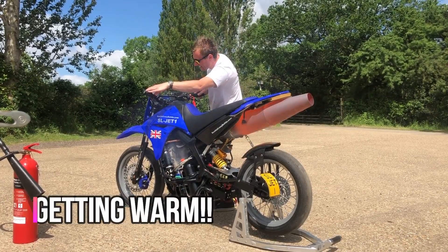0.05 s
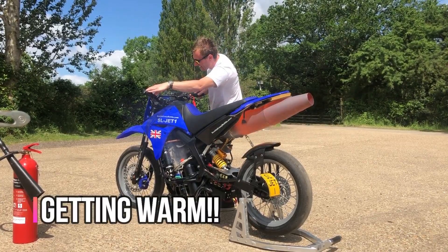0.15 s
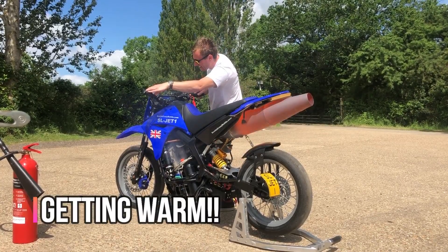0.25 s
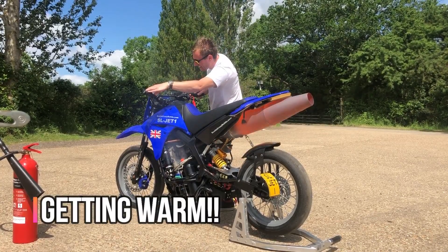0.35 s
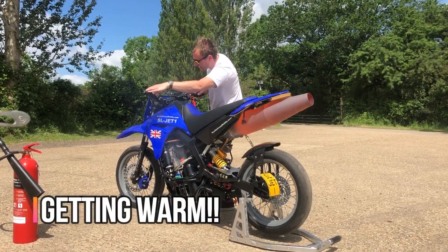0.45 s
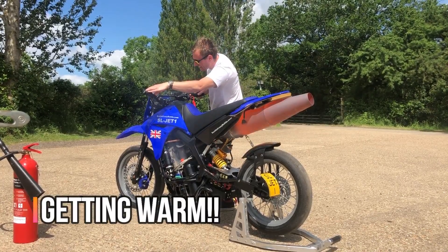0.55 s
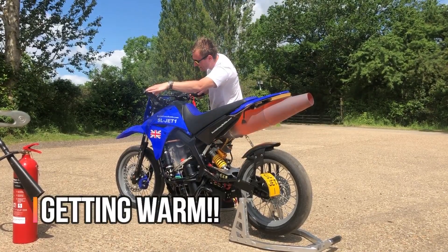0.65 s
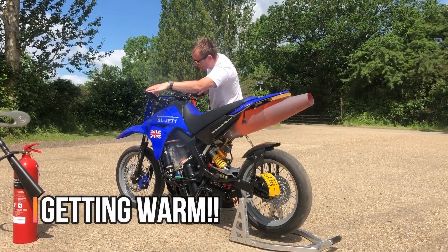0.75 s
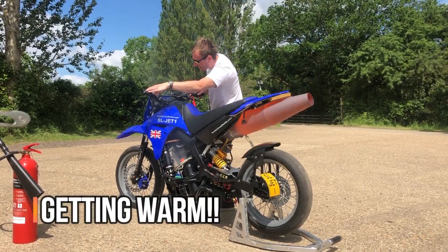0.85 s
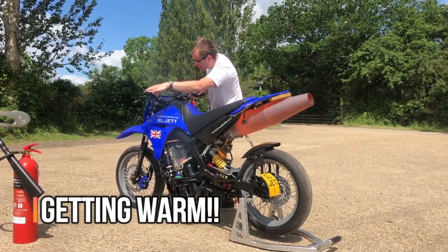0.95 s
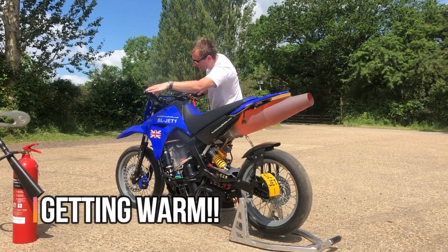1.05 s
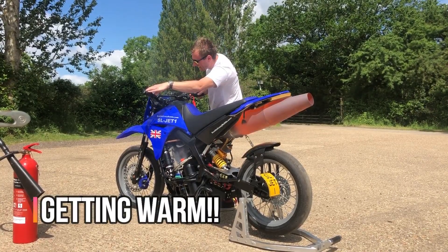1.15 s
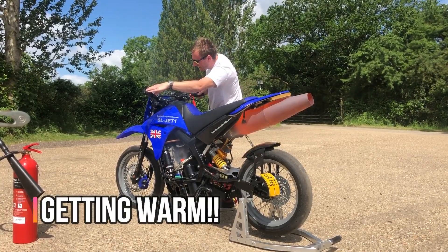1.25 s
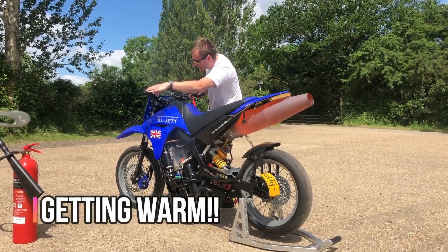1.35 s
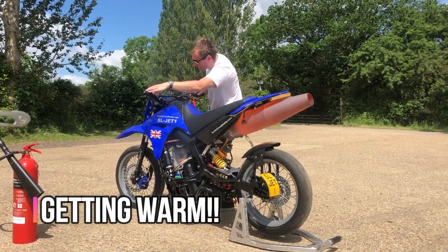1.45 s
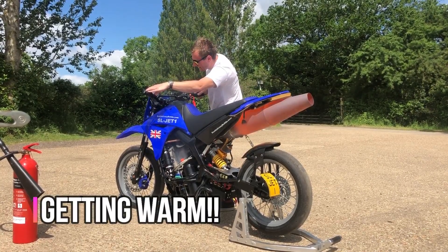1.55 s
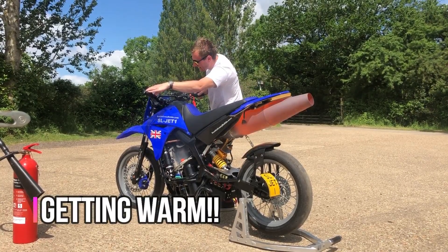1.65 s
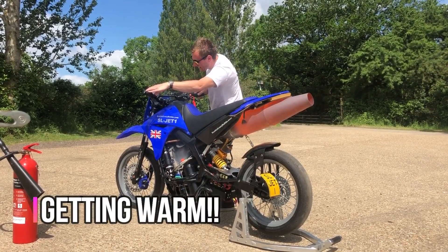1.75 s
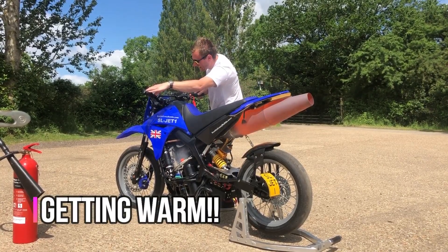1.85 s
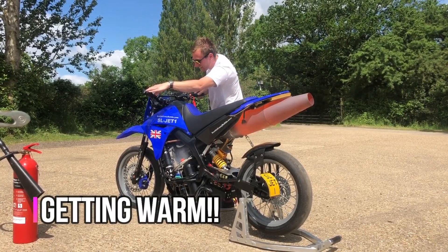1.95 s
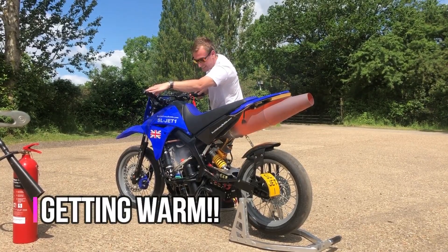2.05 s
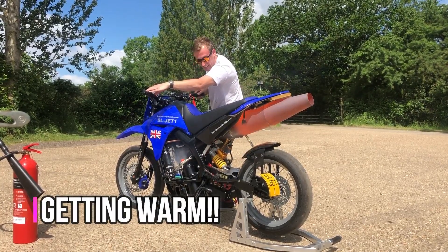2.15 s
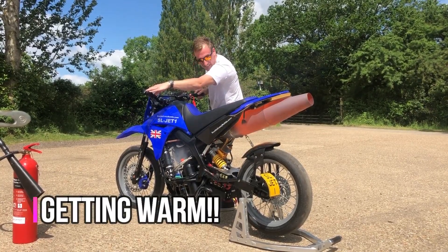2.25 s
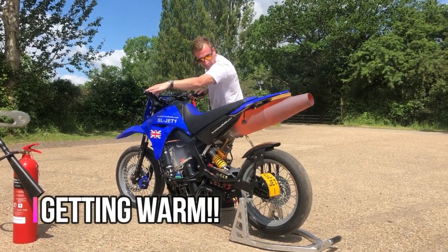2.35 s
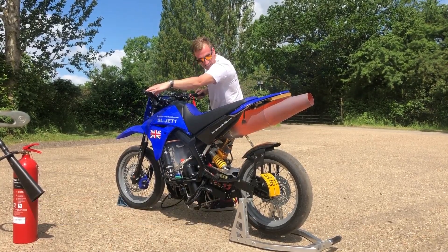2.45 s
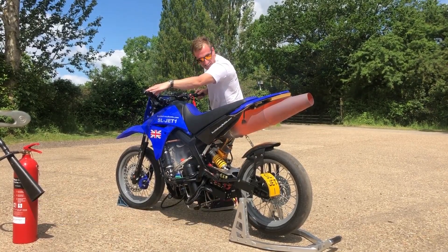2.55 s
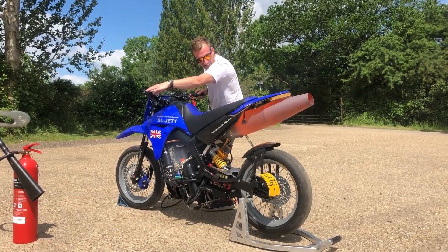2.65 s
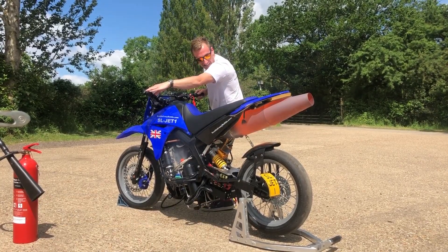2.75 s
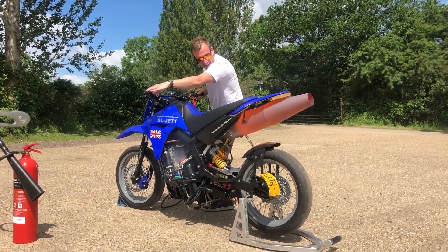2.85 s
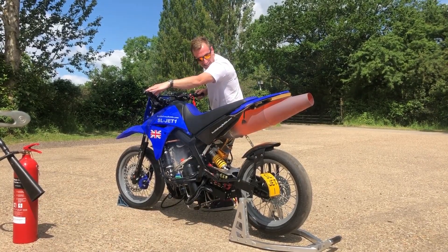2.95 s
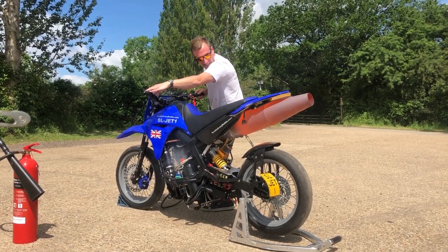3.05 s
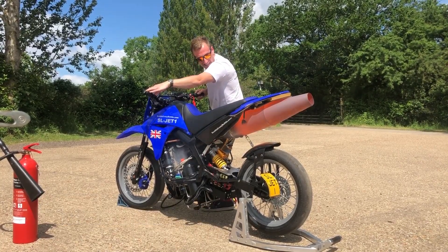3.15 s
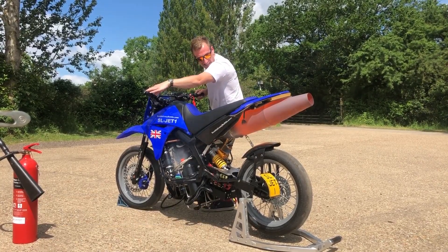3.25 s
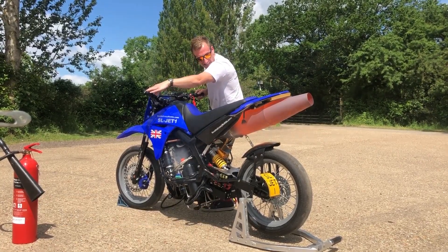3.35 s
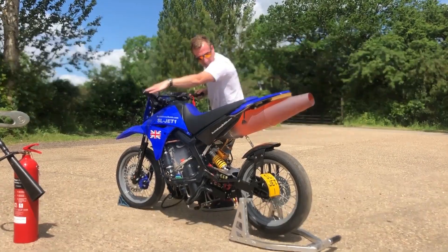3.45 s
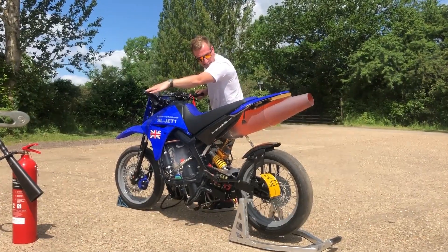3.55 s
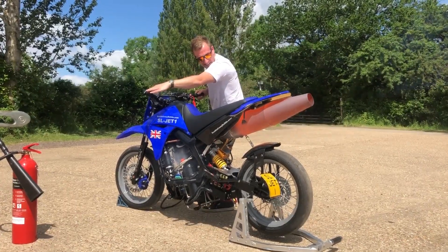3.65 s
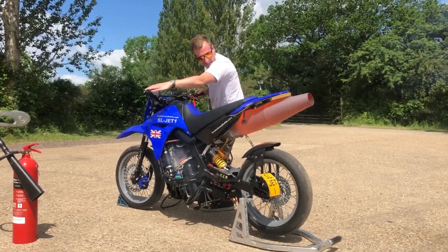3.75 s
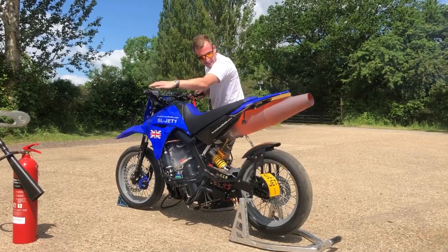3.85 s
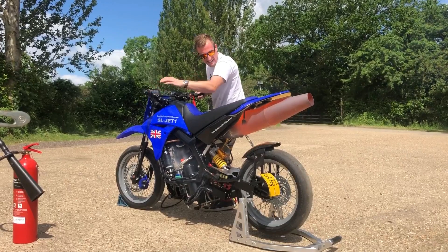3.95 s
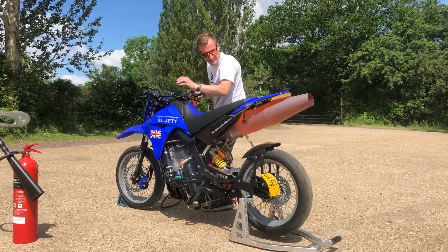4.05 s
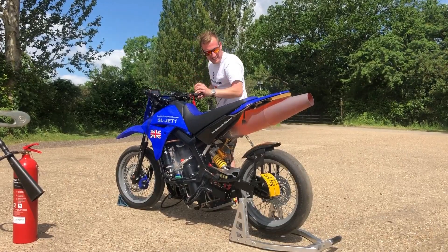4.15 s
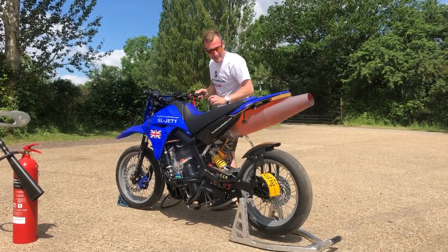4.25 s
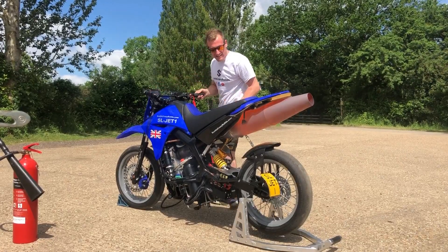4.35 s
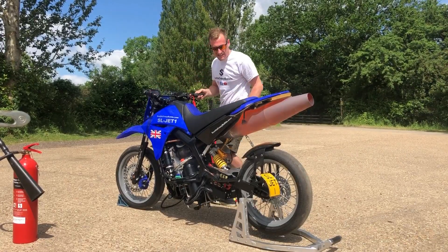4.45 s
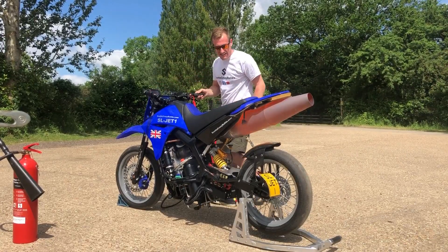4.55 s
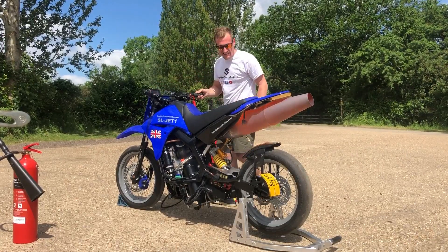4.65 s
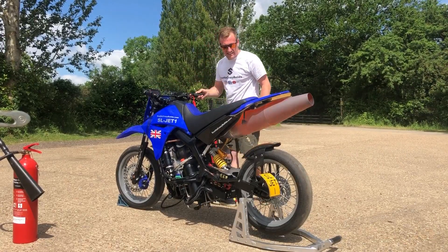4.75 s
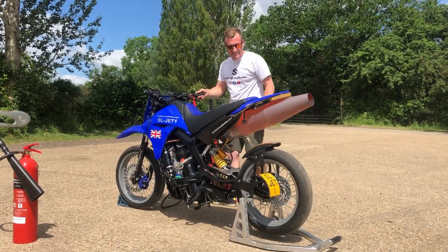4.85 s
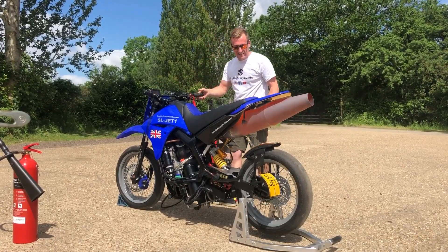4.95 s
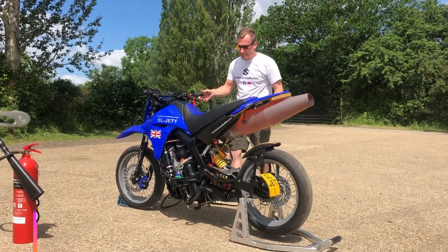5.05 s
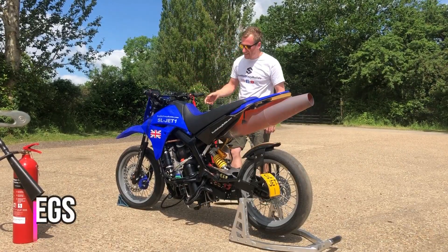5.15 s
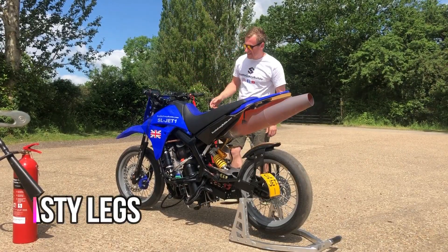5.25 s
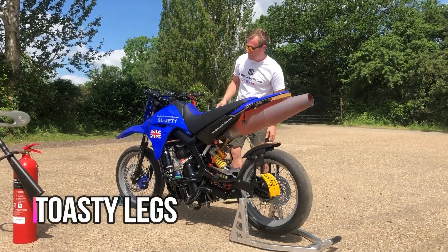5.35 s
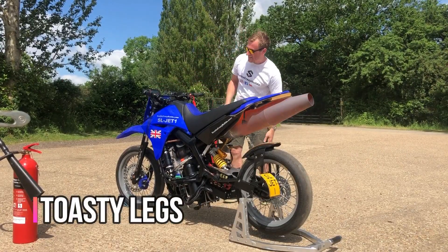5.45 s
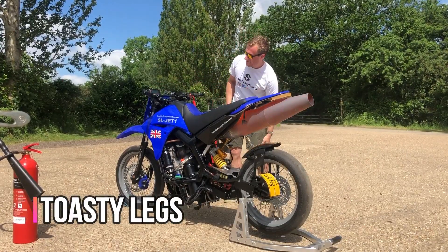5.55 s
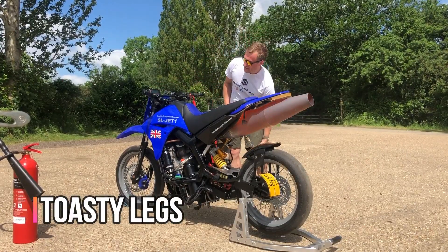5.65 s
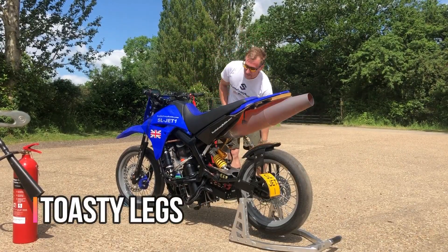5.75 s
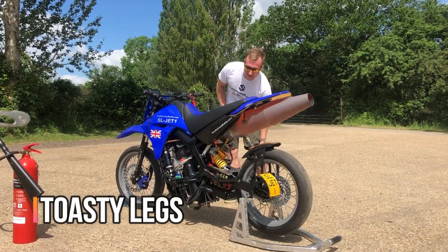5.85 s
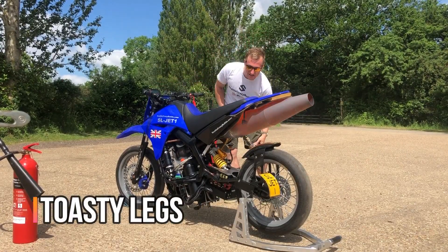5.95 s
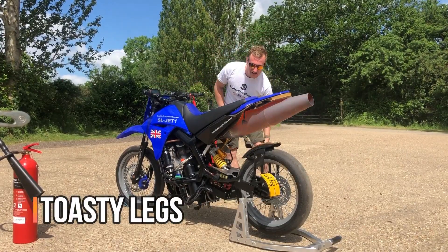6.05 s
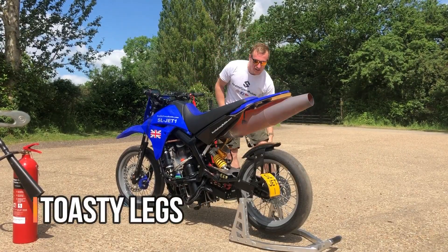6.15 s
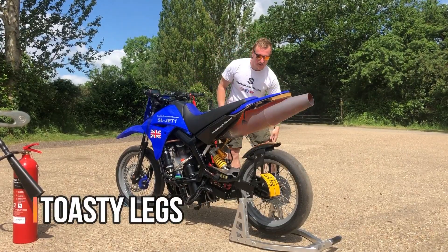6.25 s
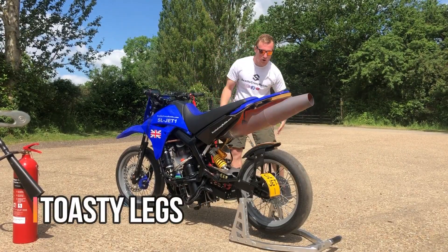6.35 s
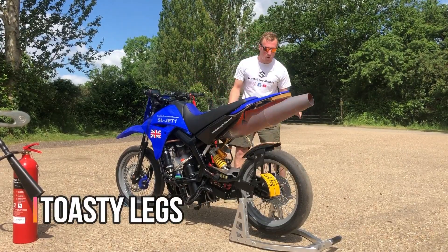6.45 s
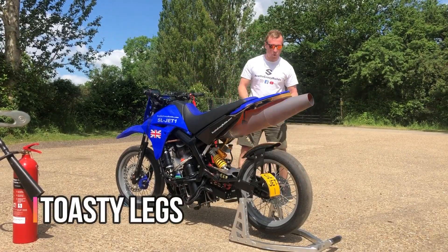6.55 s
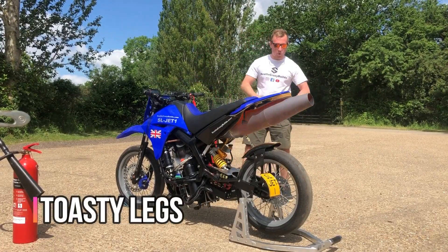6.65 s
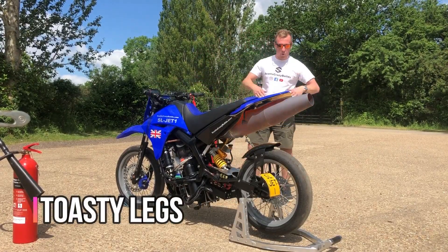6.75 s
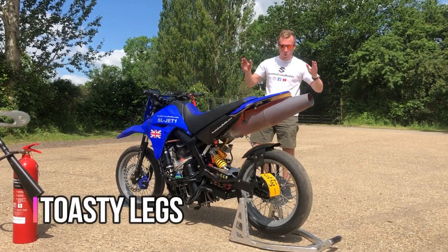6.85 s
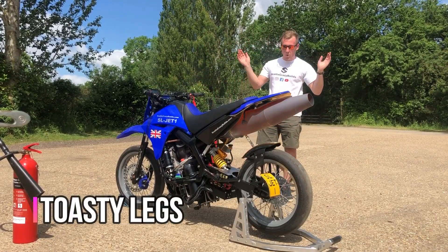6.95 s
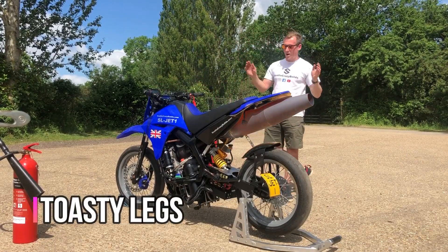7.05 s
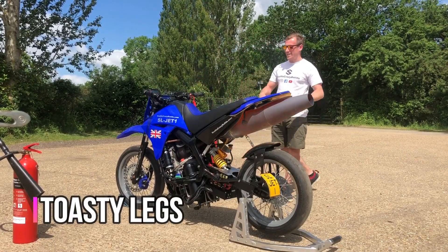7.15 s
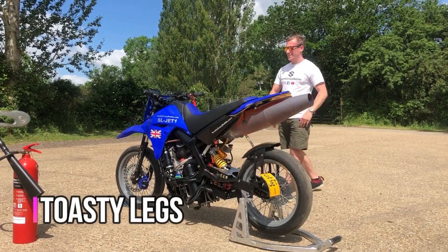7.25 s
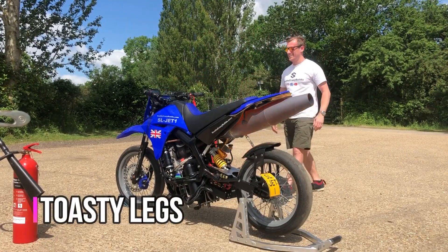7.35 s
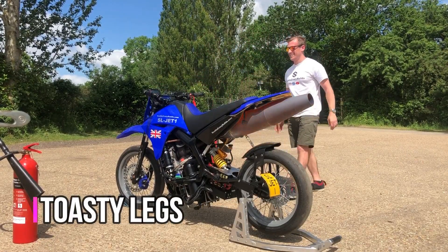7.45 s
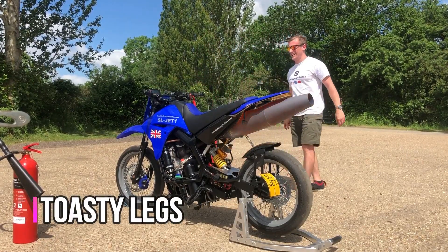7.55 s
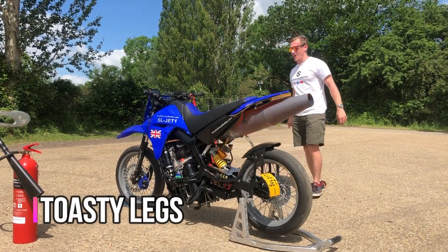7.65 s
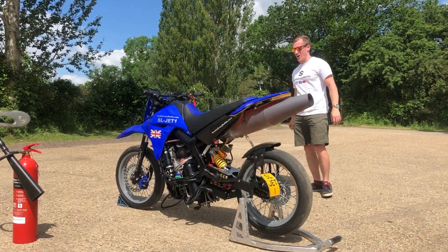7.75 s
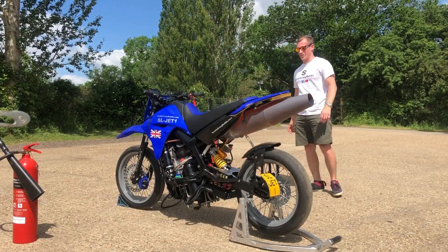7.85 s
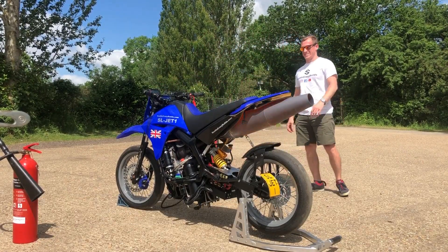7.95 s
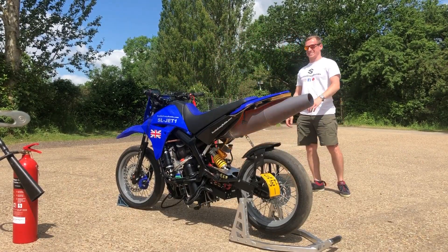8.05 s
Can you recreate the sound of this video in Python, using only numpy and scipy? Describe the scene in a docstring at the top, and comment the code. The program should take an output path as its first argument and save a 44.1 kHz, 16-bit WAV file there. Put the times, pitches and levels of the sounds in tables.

```python
"""Small gas turbine with afterburner

A small gas turbine on a parked motorcycle is heard through one microphone.
The afterburner roars (coloured noise) and hums (sines), then sputters out in a train of pops:
noise bursts, each with a thump of ringing resonances. A howl, a swell of breath and a whistle pass.
The bare engine is left: blade whine, a sine tied to the shaft speed, sinks towards idle over
the rumble and hiss of the exhaust, made of flickering noise.
"""
import sys
import numpy as np
from scipy import signal
from scipy.fft import rfft, irfft, next_fast_len
from scipy.io import wavfile
from scipy.ndimage import uniform_filter1d

SR = 44100
rng = np.random.default_rng(int(sys.argv[2]) if len(sys.argv) > 2 else 0)


def wav_record(signal):
    """Record a signal, one row per channel, as 16-bit PCM in the file named by sys.argv[1]."""
    frames = np.transpose(np.atleast_2d(signal))
    bounded = np.clip(frames, -1, 1)
    # unit amplitude maps onto the largest positive 16-bit level
    quanta = np.round(bounded * 32767).astype(np.int16)
    wavfile.write(sys.argv[1], SR, quanta)


N = 357635   # length in samples
CUTOFF_HZ = 15770   # a steep low-pass removes the sound above this pitch


def from_db(db):
    """Turn decibels into gain."""
    return 10 ** (np.asarray(db) / 20)


def rms_one(x):
    """Scale a signal to an rms of 1."""
    return x / np.sqrt(np.mean(x ** 2) + 1e-20)


def in_time(rows):
    """Turn each column after start_s into a curve with one value a sample."""
    start_s, *columns = np.transpose(rows)
    t = np.arange(N) / SR
    return [np.interp(t, start_s, column) for column in columns]


def drift(rate_hz):
    """Slow random wandering of rms 1: noise smoothed twice by a one-pole low-pass."""
    step = 40   # samples between random values; the gaps are filled with straight lines
    r = np.exp(-2 * np.pi * rate_hz * step / SR)
    noise = rng.standard_normal(N // step + 2002)
    slow = signal.lfilter([1], [1, -2 * r, r * r], noise)[2000:]   # skip the filter's start
    return np.interp(np.arange(N) / step, np.arange(len(slow)), rms_one(slow))


def tone(pitch_hz):
    """A sine of rms 1 that follows a pitch curve from a random starting phase."""
    turns = np.cumsum(pitch_hz) / SR + rng.random()
    return np.sqrt(2) * np.sin(2 * np.pi * turns)


def turbulence(spectrum, pipe, together_db, patchy_db):
    """Noise of rms 1 shaped by pipe resonances; its octave bands flicker partly together, partly alone."""
    size = next_fast_len(N)
    hz = np.maximum(np.fft.rfftfreq(size, 1 / SR), 1)
    points = np.array(spectrum)
    level_db = np.interp(np.log(hz), np.log(points[:, 0]), points[:, 1])
    for centre_hz, width_hz, peak_db in pipe:
        level_db += peak_db / (1 + (2 * (hz - centre_hz) / width_hz) ** 2)
    coloured = rfft(rng.standard_normal(size)) * from_db(level_db)
    octave = np.log2(np.clip(hz, 125, 16000) / 125)
    gust = drift(14)
    out = 0
    for k in range(8):
        share = np.cos(np.pi / 2 * np.clip(octave - k, -1, 1)) ** 2   # neighbouring shares sum to 1
        band = irfft(coloured * share, size)[:N]
        out = out + band * from_db(together_db * gust + patchy_db * drift(21))
    return rms_one(out)


ROAR_DB, FLAME_OUT_S, COLLAPSE_S = -11.5, 3.33, 0.25   # steady roar, then the flame collapses
EMBER_DB, EMBER_SAG_DB_PER_S, EMBER_END_S, EMBER_FADE_S = -27, 8, 4.2, 0.29   # a weak flame lingers


def flame_db():
    """The flame's level holds, collapses to a weak flame that sags, and goes out."""
    low_s = FLAME_OUT_S + COLLAPSE_S
    last_db = EMBER_DB - EMBER_SAG_DB_PER_S * (EMBER_END_S - low_s)
    return in_time([(FLAME_OUT_S, ROAR_DB), (low_s, EMBER_DB), (EMBER_END_S, last_db),
                    (EMBER_END_S + EMBER_FADE_S, -60)])[0]


# Pops as the flame dies and relights: start_s [s, middle of the burst], burst_db [dB]
POPS = [(3.391, -8), (3.404, -14), (3.419, -7.5), (3.434, -10.5), (3.45, -8), (3.464, -10), (3.479, -6),
        (3.494, -10), (3.51, -10), (3.524, -10.5), (3.544, -9), (3.562, -10), (3.586, -12), (3.625, -11.5)]
# Colour of the roar: pitch_hz [Hz], relative_level_db [dB per Hz]
ROAR_COLOUR = [(25, -34), (50, -14), (75, -11), (200, -8), (300, -7.5), (500, -7.5), (1210, -6.5),
               (2020, -7.5), (3200, -7.5), (4640, -5), (6080, -12), (7540, -8.5), (11000, -12.5),
               (13500, -15.5), (14800, -12.5), (15700, -15.5)]
# Pipe resonances in the roar: pitch_hz [Hz], width_hz [Hz], peak_db [dB]
ROAR_PIPE = [(670, 27, 3.5), (1237, 95, 2.5), (2180, 30, 4), (810, 24, 4), (1006, 76, 1)]
POP_S = .003   # half-length of a burst


def flame():
    """Steady roar, then relighting bursts: the powers add up and drive one turbulent noise."""
    t = np.arange(N) / SR
    power = from_db(2 * flame_db())   # doubled decibels give power
    for start_s, burst_db in POPS:
        power += from_db(2 * burst_db) * np.exp(-((t - start_s) / POP_S) ** 2)
    return np.sqrt(power) * turbulence(ROAR_COLOUR, ROAR_PIPE, together_db=0.6, patchy_db=0.54)


# Ringing of the tailpipe struck by a pop: pitch_hz [Hz], level_db [dB], t60_s [s, time to fall 60 dB]
THUMP_RING = [(62, -13, .17), (120, -10, .08), (260, -3, .02)]
# Thump against burst at the strongest time; the thumps swell, then fade, 6 dB down a span away
THUMP_DB, THUMP_PEAK_S, THUMP_SPAN_S = 1.5, 3.48, 0.19


def thumps():
    """Each pop kicks the tailpipe, whose resonances ring and die away."""
    kicks = np.zeros(N)
    for start_s, burst_db in POPS:
        fade_db = 6.0 * ((start_s - THUMP_PEAK_S) / THUMP_SPAN_S) ** 2
        kicks[round(start_s * SR)] = from_db(burst_db + THUMP_DB - fade_db)
    out = np.zeros(N)
    for pitch_hz, level_db, t60_s in THUMP_RING:
        r = from_db(-60 / (t60_s * SR))   # loss per sample
        w = 2 * np.pi * pitch_hz / SR   # radians per sample
        # the tiny offset keeps the filter off vanishingly small numbers
        ring = signal.lfilter([0, -np.sin(w)], [1, -2 * r * np.cos(w), r * r], kicks + 1e-18)
        out += from_db(level_db) * ring
    return out


# Flame humming in the tailpipe, sagging as it stops: start_s [s], pitch_hz [Hz], level_db [dB]
HUM = [(0, 238, -30), (2.2, 236.5, -29.5), (2.33, 228, -30), (2.39, 212, -33), (2.5, 210, -60)]
HUM_OCTAVE_DB = -4   # octave against the hum


def hum():
    """The flame hums in the tailpipe: a slightly wandering sine and its octave."""
    pitch_hz, level_db = in_time(HUM)
    pitch_hz = pitch_hz + 1.2 * drift(4)
    low = from_db(0.18 * drift(5.6)) * tone(pitch_hz)
    octave = from_db(HUM_OCTAVE_DB + 2.7 * drift(8)) * tone(2 * pitch_hz)
    return from_db(level_db) * (low + octave)


# Compressor shaft before its changes are rounded: start_s [s], speed [turns per s]
SPOOL = [(0, 1742.1), (.7, 1723.5), (1.9, 1718.7), (2.2, 1702.5), (2.45, 1668.8), (2.75, 1613.4),
         (3.05, 1580.2), (3.3, 1562.5), (3.5, 1585.4), (3.8, 1649.4), (4.0, 1666.5), (4.25, 1632.4),
         (4.5, 1525.6), (4.75, 1416.5), (4.92, 1375.5), (5.15, 1345.5), (5.6, 1321.2), (5.92, 1309.4),
         (6.25, 1305.3), (6.85, 1286.3), (7.5, 1273.9), (8.11, 1267)]
INERTIA_S = .2   # the rotor rounds every change over this time
# Near idle the speed swings a little: from [s], swings per s, depth [turns per s]
HUNT_FROM_S, HUNT_PER_S, HUNT_TURNS = 4.954, 3.82, 1.1


def shaft_speed():
    """Turns per second: the rotor's inertia smooths the table, then a small swing is added."""
    since_s = np.maximum(np.arange(N) / SR - HUNT_FROM_S, 0)
    smooth = uniform_filter1d(in_time(SPOOL)[0], size=round(INERTIA_S * SR), mode="nearest")
    return smooth + HUNT_TURNS * np.sin(2 * np.pi * HUNT_PER_S * since_s)


# Level of the blade whine: start_s [s], level_db [dB]
WHINE = [(0, -29), (.35, -26), (.6, -33), (1.2, -38), (1.5, -32), (1.9, -38), (2.25, -26), (2.7, -25.5),
         (3.3, -21.5), (3.5, -26), (3.85, -23), (3.9, -18), (4.07, -15), (4.22, -29), (4.27, -22.5),
         (4.5, -20.5), (4.65, -17), (4.77, -23), (4.95, -35.5), (5.33, -21), (6.15, -17.5), (6.6, -19.5),
         (6.75, -24), (7.1, -26.5), (7.35, -33), (7.55, -21.5), (8.11, -21.5)]
# Shaft speeds at idle, slowing down and fast [turns per s]
ORDER_SPEEDS = (1310, 1420, 1630)
# Random flutter of the whine at those three speeds [dB]
FLUTTER_DB = (0.9, 3.1, 2)
BLADES = 7


def blade_whine(shaft_hz):
    """Every passing blade makes one cycle of a fluttering sine."""
    flutter_db = np.interp(shaft_hz, ORDER_SPEEDS, FLUTTER_DB) * drift(19)
    return from_db(in_time(WHINE)[0] + flutter_db) * tone(BLADES * shaft_hz)


# Weaker shaft tones: multiple [times shaft speed], idle_db [dB], slowing_db [dB], fast_db [dB]
SHAFT_TONES = [(1.0, -50, -58, -44), (2.0, -49, -60, -58), (4.0, -55, -61, -46), (5.0, -52, -52, -64),
               (6.0, -66, -60, -49), (8.0, -58, -64, -54), (9.0, -57, -55, -52), (11.0, -60, -68, -70),
               (12.0, -42, -50, -60)]


def shaft_tones(shaft_hz):
    """Sines on other multiples of the shaft speed, with wandering pitch and level."""
    out = np.zeros(N)
    for multiple, *levels_db in SHAFT_TONES:
        level_db = np.interp(shaft_hz, ORDER_SPEEDS, levels_db) + 2.5 * drift(6)
        below_cutoff = multiple * shaft_hz < CUTOFF_HZ
        out += below_cutoff * from_db(level_db) * tone(multiple * shaft_hz + 6 * drift(20))
    return out


# Breath just under the whine, from stalled air turning slower than the blades:
# start_s [s], multiple [times shaft speed], level_db [dB]
STALL = [(4.7, 6.82, -62), (5.2, 6.79, -48), (6.0, 6.72, -42), (7.0, 6.7, -38), (7.5, 6.7, -35),
         (8.11, 6.7, -36)]
# Turbine wakes, a broad hiss beside the twelfth multiple:
# start_s [s], multiple [times shaft speed], level_db [dB]
WAKES = [(5.5, 12.15, -60), (6.2, 12.15, -48), (7.0, 12.15, -42), (7.5, 12.15, -36), (8.11, 12.15, -43)]


def stall_and_wakes(shaft_hz):
    """Sines of randomly wandering strength become breathy bands that follow the shaft."""
    out = np.zeros(N)
    for band, spread_hz in ((STALL, 70), (WAKES, 200)):
        multiple, level_db = in_time(band)
        out += from_db(level_db) * drift(spread_hz) * tone(multiple * shaft_hz)
    return out


# Pipe howling above the hum, strongest after the hum has gone: start_s [s], pitch_hz [Hz], level_db [dB]
HOWL = [(1.9, 665, -43), (2.3, 653, -30.5), (2.8, 645.5, -30.5), (3.3, 629, -28.5), (3.6, 624, -35),
        (3.8, 615, -64)]


def howl():
    """A narrow band of noise at a gliding pipe resonance."""
    pitch_hz, level_db = in_time(HOWL)
    return from_db(level_db) * drift(32) * tone(pitch_hz)


# Bare exhaust: start_s [s], flow_db [dB], treble_db [dB, intake hiss against the flow]
EXHAUST = [(3.7, -28.5, -4), (4.0, -29, -3.5), (4.3, -30.5, -2.5), (4.75, -34.5, 0), (5.6, -31.5, -1.5),
           (6.6, -32.5, -2), (6.85, -32, -1), (7.1, -29.5, -2), (7.5, -28, -1), (8.11, -27, -2)]
# Colours of rumble, jet and intake: pitch_hz [Hz], relative_level_db [dB per Hz]
RUMBLE_COLOUR = [(25, -58), (60, -20.5), (130, -14.5), (250, -13.5), (380, -9), (550, -4), (900, -9.5),
                 (1500, -9.5), (2400, -13.5), (2900, -25), (4000, -31)]
JET_COLOUR = [(1500, -21), (2600, -6.5), (3100, -4), (3650, -1.5), (5000, -1.5), (6000, -7.5), (7500, -5),
              (9000, -52), (12000, -45)]
INTAKE_COLOUR = [(5000, -9.5), (7500, -2), (9000, 2), (10500, -0.5), (12500, -4.5), (15000, 0), (16000, -9)]
# Pipe resonances in rumble and jet: pitch_hz [Hz], width_hz [Hz], peak_db [dB]
RUMBLE_PIPE = [(360, 27, -7.5), (468, 140, 2), (634, 200, 5), (710, 32, -9), (990, 43, 6.5), (1235, 150, 5),
               (1380, 100, -5.5), (1840, 250, 3.5), (2360, 120, 5), (2575, 69, 11.5)]
JET_PIPE = [(3660, 260, 3.5), (4240, 300, 1)]
JET_DB, JET_LAG_DB = -1.0, -2.0   # jet hiss against the flow, and its further loss at idle


def exhaust():
    """Combustion rumble in the pipe, jet hiss and brighter intake hiss, all following the flow."""
    flow_db, treble_db = in_time(EXHAUST)
    idling = np.interp(in_time(SPOOL)[0], ORDER_SPEEDS[:2], [1, 0])   # 1 at idle, 0 when faster
    jet_db = JET_DB + JET_LAG_DB * idling
    rumble = turbulence(RUMBLE_COLOUR, RUMBLE_PIPE, together_db=0.58, patchy_db=-0.2)
    jet = from_db(jet_db) * turbulence(JET_COLOUR, JET_PIPE, together_db=0.4, patchy_db=0.67)
    intake = from_db(treble_db) * turbulence(INTAKE_COLOUR, [], together_db=0.6, patchy_db=1.0)
    return from_db(flow_db) * (rumble + jet + intake)


# Breathy air bands: multiple [times shaft speed], spread_hz [Hz], level_db [dB at the peak]
SURGE = [(1.0, 60, -41), (2.7, 150, -42), (6.0, 60, -44)]
SURGE_S, SURGE_SPAN_S = 4.2, 0.29   # time of the peak, and how far from it the swell reaches


def surge():
    """Around the bare rotor's peak, narrow noise bands tied to the shaft swell and fade once."""
    shaft_hz = in_time(SPOOL)[0]
    swell = np.exp(-((np.arange(N) / SR - SURGE_S) / SURGE_SPAN_S) ** 2)
    out = np.zeros(N)
    for multiple, spread_hz, level_db in SURGE:
        out += from_db(level_db) * drift(spread_hz) * tone(multiple * shaft_hz)
    return swell * out


# Thin whistle as the engine slows: start_s [s], pitch_hz [Hz], level_db [dB]
WHISTLE = [(4.3, 6680, -65), (4.62, 6720, -39), (4.93, 6850, -41), (5.1, 6900, -44), (5.5, 6900, -53),
           (6.2, 6940, -64)]


def whistle():
    """A sine of wavering pitch and level, with a fainter octave."""
    pitch_hz, level_db = in_time(WHISTLE)
    pitch_hz = pitch_hz + 22 * drift(42)
    wavering = from_db(level_db + 3.0 * drift(12.4))
    return wavering * (tone(pitch_hz) + from_db(-7) * tone(2 * pitch_hz))


def scene():
    """Add all the sounds; one microphone feeds both channels."""
    shaft_hz = shaft_speed()
    afterburner = flame() + thumps() + hum()
    compressor = blade_whine(shaft_hz) + shaft_tones(shaft_hz) + stall_and_wakes(shaft_hz)
    mix = afterburner + compressor + howl() + exhaust() + surge() + whistle()
    return np.tile(mix, (2, 1))


MIC_LOW_HZ = 55   # the microphone weakens sound below this


def record(dry):
    """The microphone loses deep bass; then peaks are rounded and a steep low-pass removes the top."""
    bass_cut = signal.butter(3, MIC_LOW_HZ, "high", fs=SR, output="sos")
    heard = signal.sosfilt(bass_cut, dry)
    rounded = 1.2 * np.tanh(heard / 1.2)
    low_pass = signal.ellip(16, .3, 85, CUTOFF_HZ, fs=SR, output="sos")
    return signal.sosfilt(low_pass, rounded)


dry = scene()
out = record(dry)
wav_record(out)
```